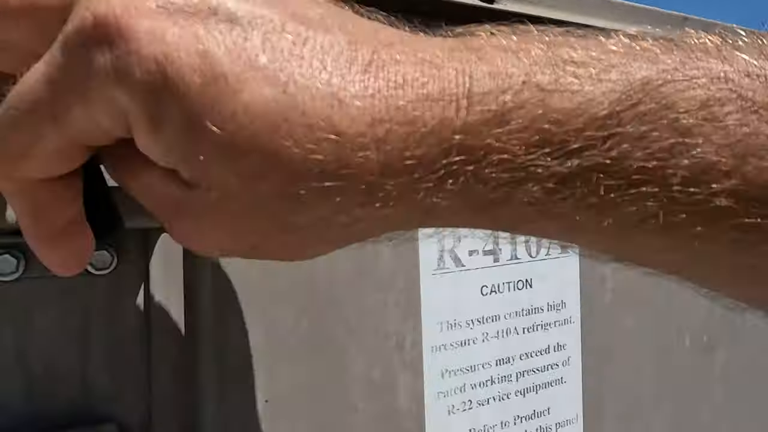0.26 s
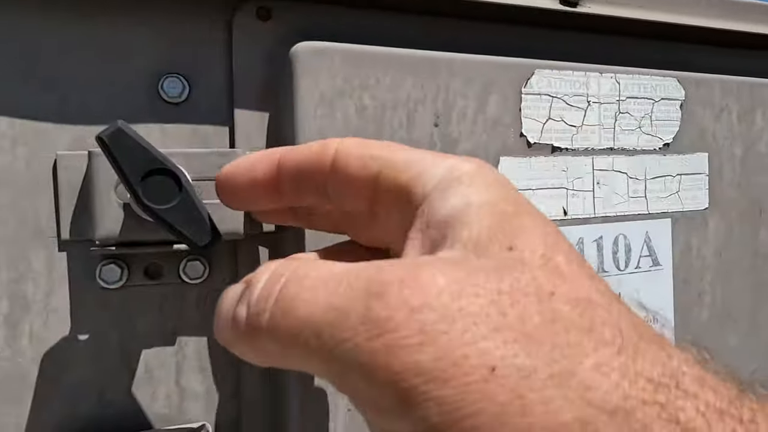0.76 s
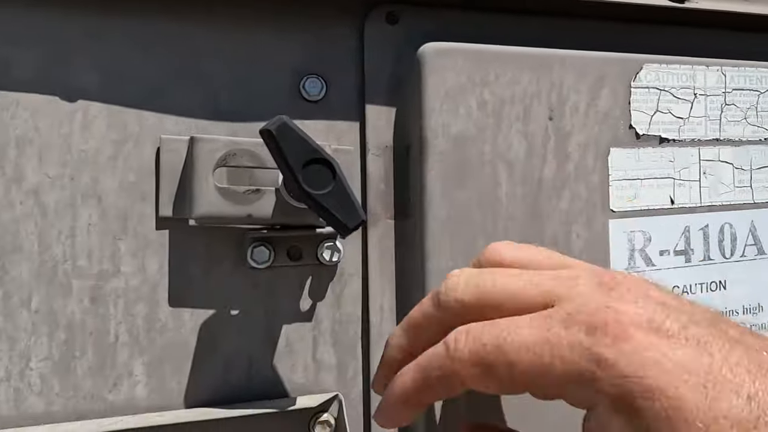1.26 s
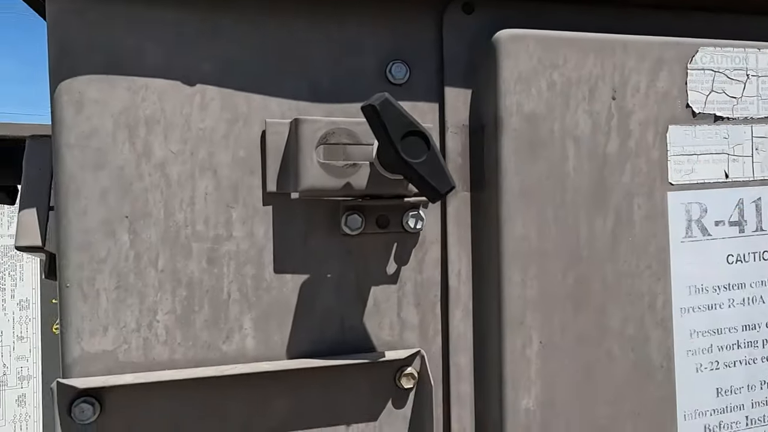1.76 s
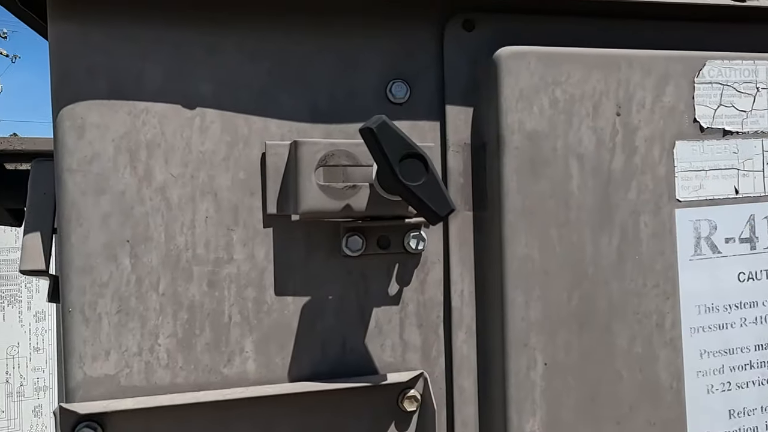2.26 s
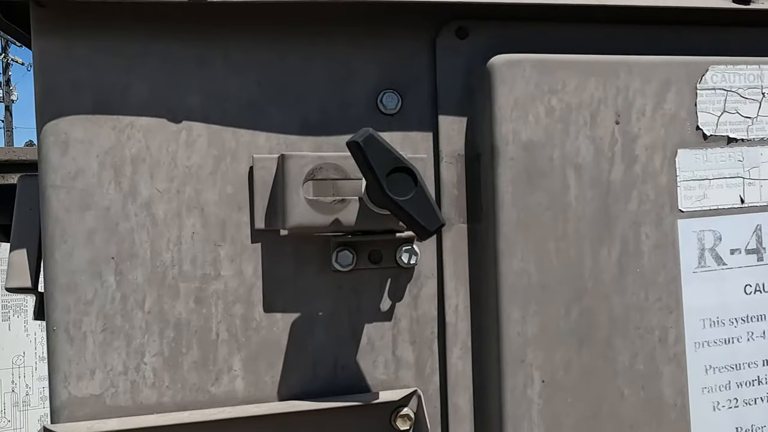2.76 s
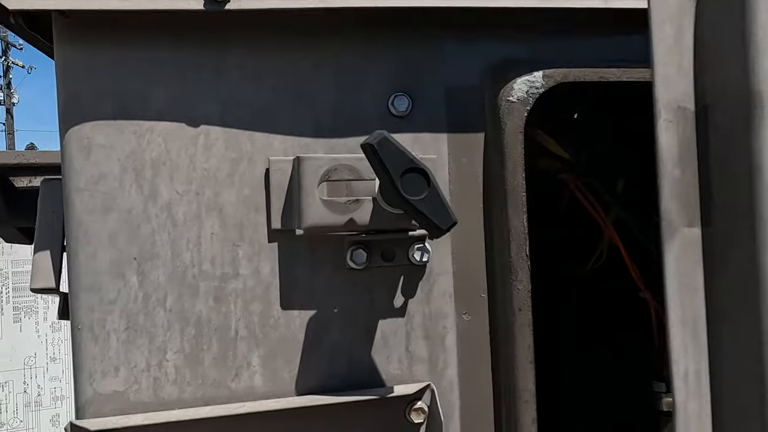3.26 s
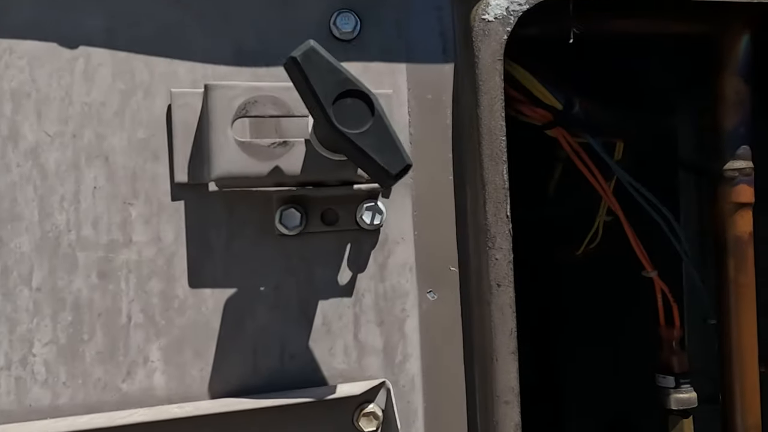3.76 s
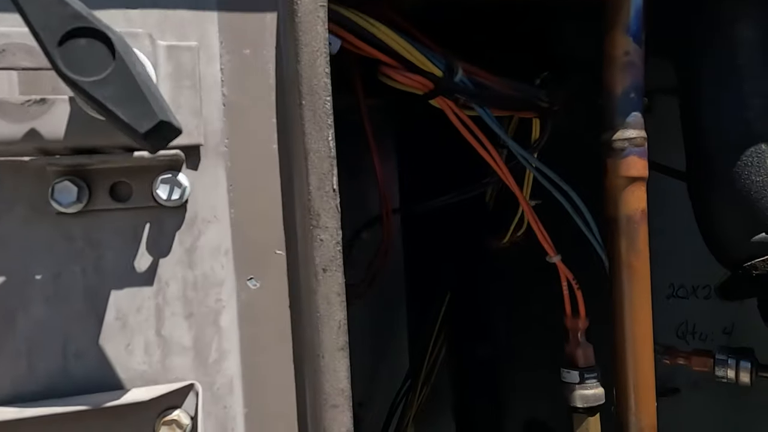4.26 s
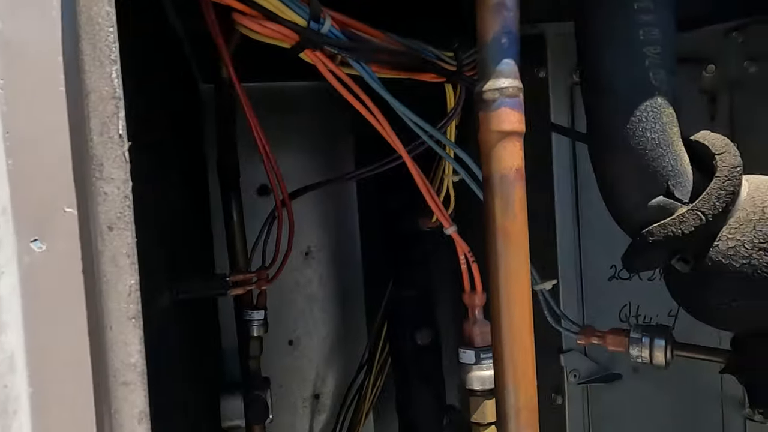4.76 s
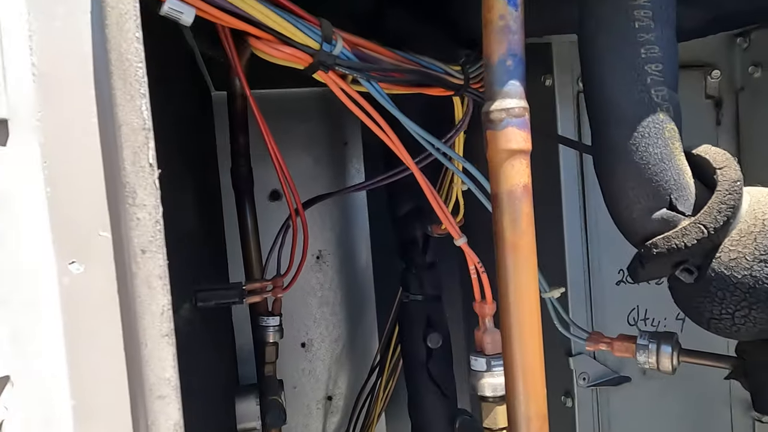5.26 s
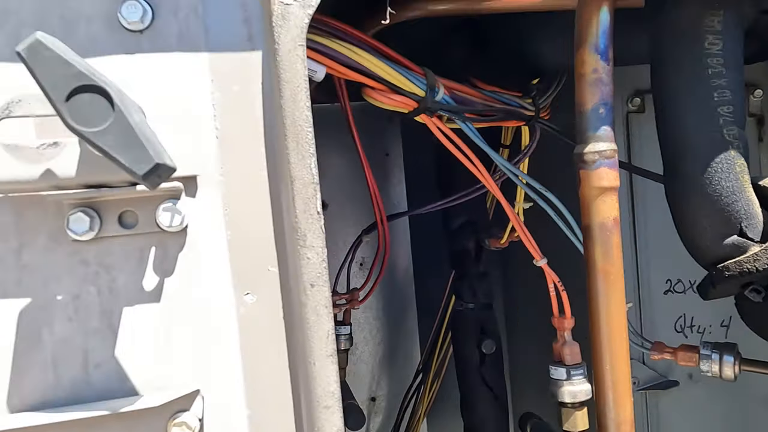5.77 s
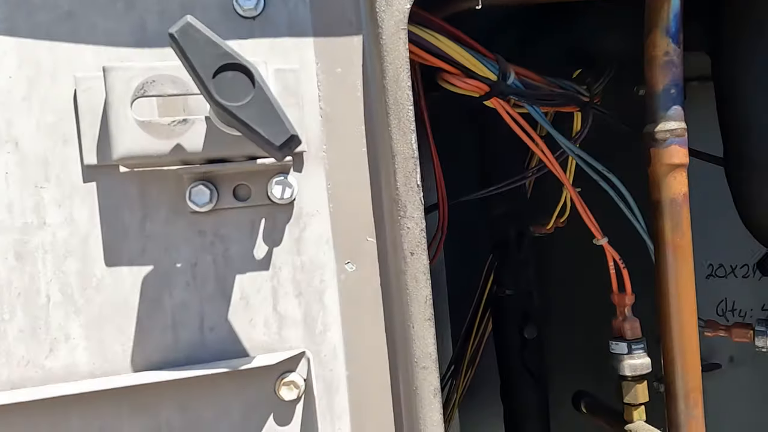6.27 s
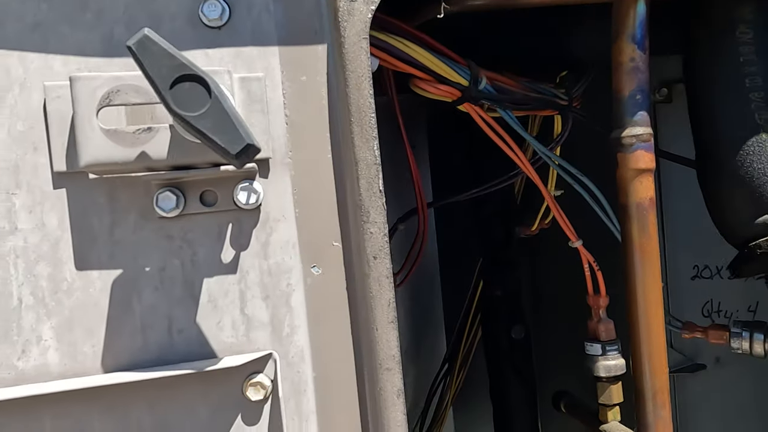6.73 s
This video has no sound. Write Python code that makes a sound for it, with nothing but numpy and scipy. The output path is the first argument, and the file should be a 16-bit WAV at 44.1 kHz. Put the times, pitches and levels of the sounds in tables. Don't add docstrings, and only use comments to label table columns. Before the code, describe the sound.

Throughout, a rooftop cooling unit gives a low housing rumble, a broad dull rush of air and a thinner panel hiss, close and dry outdoors. A loose flap puffs softly and irregularly until about 3.5 s, its bracket ringing faintly. At 0.25-0.35 s a hand knocks and rubs the handle; after more rubbing from 0.76 s, the catch snaps at 0.93 s, very loud, bright and short, with a small panel thud. The sound ducks, recovering over a few tenths. Fingers brush lightly. At 2.7-2.86 s dry metal ticks cluster, then the sheet door scrapes in short shudders from 3.0 to 4.1 s, with a knock at 3.44 s. Compressor clatter, about 58 pulses a second, swells from 3 to 4 s with gas hiss, pinging valves and steady whine. A last scrape and air gust come near 4.8 s; around 5 s the compressor's tone shifts, then continues to 7 s.

```python
import sys
import numpy as np
from scipy import signal
from scipy.fft import rfft, irfft
from scipy.io import wavfile
from scipy.ndimage import uniform_filter1d, map_coordinates

SR = 44100
rng = np.random.default_rng(int(sys.argv[2]) if len(sys.argv) > 2 else 0)


def log_audio(samples):
    frames = np.atleast_2d(samples).T
    limited = np.clip(frames, -1, 1)
    pcm = np.round(limited * 32767).astype(np.int16)
    wavfile.write(sys.argv[1], SR, pcm)


def invert_db(x):
    u = np.asarray(x, float) / 20
    return 10 ** u


N = 308700
T = np.arange(N) / SR
HIT_T = T[:4096]

SHAFT_HZ = 58.152
# (time [s], level [dB])
GAP_LEVEL = [
    (2.9, -54),
    (3.5, -42.5),
    (3.72, -38.5),
    (4.11, -37.5),
    (4.68, -37.5),
    (5.45, -39.5),
    (5.82, -40.5),
    (6.68, -39.5),
    (7.0, -39),
]
# (frequency [Hz], width [Hz], level [dB])
SHELL_MODES = [
    [(1130, 24, 1), (1490, 18, -23), (1810, 63, -16), (2650, 220, -5), (3390, 70, 0), (3760, 100, -5), (4050, 26, -20), (4570, 160, 0), (5070, 27, -3), (5880, 67, -23), (6700, 54, -10), (12200, 1300, -31)],
    [(1110, 32, -25), (1540, 30, -33), (2700, 350, -8), (3040, 36, -3), (3400, 77, -1), (4250, 56, -29), (4770, 72, -13), (5140, 79, 1), (5790, 100, -2), (6700, 20, 2), (10700, 110, -24), (12100, 630, 0)],
]
# (frequency [Hz], level [dB per Hz])
CLATTER_COLOUR = [(530, -33), (900, 5), (1150, -10), (1390, 3), (1490, -1), (1940, -3), (2340, -8),
                  (3370, -8.5), (5040, -12.5), (5480, -24), (5920, -7), (6400, -10.5), (10000, -39),
                  (13000, -65), (22000, -120)]
# (frequency [Hz], level [dB per Hz])
GAS_COLOUR = [(880, -8), (1500, -14), (1660, -26), (1880, -4), (2380, -20), (2750, -8.5), (3210, -18),
              (3480, -6.5), (4330, -10.5), (5200, -9), (5500, -10), (5700, -4.5), (5890, -5.5),
              (6690, -9.5), (7800, -18), (9180, -21.5), (11700, -18), (13100, -28.5)]
MOVE_S = 4.96, 5.13

# (frequency [Hz], at the door edge [dB], in the opening [dB], on the way in [dB], inside [dB])
VALVE_PLATES = [(5760, -50, -41.5, -48, -38), (6100, -56, -46, -44, -51), (3430, -52, -41, -48, -46),
                (3750, -45, -44, -54, -54), (4750, -54, -54, -54, -49)]
VALVE_PLACES_S = 4.05, 4.4, 4.75, 5.0, 5.35, 5.5
VALVE_DECAY_TURNS, VALVE_SCATTER_DB = .2, 2.5

# (multiple [shaft rates], at the door edge [dB rms], in the opening [dB rms], further in [dB rms])
WHINE_TONES = [(7, -32, -31.5, -32.5), (20, -50, -45, -43.5), (21, -50, -51, -50), (22, -58, -49, -46),
               (24, -60, -51, -50), (26, -50, -43.5, -46.5), (27, -54, -53, -48), (29, -52, -46, -53),
               (32, -49, -43, -50), (33, -48, -42, -47), (36, -57, -52, -49), (46, -51, -53, -55),
               (47, -62, -52, -54), (48, -62, -52, -53), (58, -57, -51, -56), (59, -55, -53, -54),
               (63, -62, -52, -58), (64, -53, -55, -57), (65, -49, -52, -54), (71, -43.5, -46, -56),
               (74, -55, -56, -59), (77, -57, -58, -57), (79, -50, -52, -58), (89, -55, -59, -58),
               (81, -54, -57, -54), (82, -56, -53, -55), (92, -54, -50, -55), (91, -62, -57, -55),
               (98, -58, -60, -55), (101, -66, -57, -54), (104, -58, -57, -58), (109, -63, -57, -61),
               (110, -63, -57, -62), (111, -58, -54, -55), (115, -53, -60, -60), (122, -66, -61, -66),
               (123, -67, -68, -64), (129, -69, -70, -68), (141, -69, -74, -65)]
WHINE_PLACES_S = 4.0, 4.35, 4.85, 5.3
BEAT_DEPTH = {26: .65, 71: .2, 79: .3}
BEAT_PERIOD_S, BEAT_TOP_S = .2636, 4.44
TONE_DRIFT_DB = 2.2
SHADOW_S, SHADOW_DB, SHADOW_HZ = (3.4, 3.7), -13, 2500

# (time [s], peak level [dB], pitch [Hz])
LATCH_KNOCKS = [
    (0.2535, -15, 2630),
    (0.3196, -11.5, 2420),
    (0.8444, -18, 2100),
    (3.4416, -26, 2720),
]
KNOCK_T60_S = 0.018
# (time [s], frequency [Hz], level [dB], length [s])
CATCH_RUBS = [(.898, 4000, -27, .025), (.9165, 1300, -13, .004), (.9215, 1600, -14, .004),
              (.9245, 2600, -20, .003), (.909, 4700, -27, .006), (.320, 1000, -20, .02),
              (.9298, 3100, -15, .002), (.929, 5000, -17, .0012), (.9325, 3200, -22, .004),
              (.938, 3600, -23, .007), (.950, 2200, -26, .006), (.917, 3500, -23, .008),
              (.9185, 2000, -19, .005), (.921, 6000, -31, .006), (.933, 7000, -36, .012),
              (.3225, 2700, -16, .005), (.3275, 3000, -17, .012), (.3405, 2500, -21, .01),
              (.321, 5000, -30, .015), (1.0585, 1300, -18, .004), (.833, 6500, -33, .005),
              (.836, 3000, -22, .008), (.790, 6800, -34, .006), (3.441, 4900, -27, .004),
              (3.613, 7000, -31, .006), (3.614, 3400, -26, .014), (3.657, 6800, -30, .008),
              (3.665, 3800, -26, .005), (3.530, 6300, -33, .006), (1.130, 6000, -30, .004)]
SNAP_S, SNAP_DB = .9286, 0.5
# (delay [s], frequency [Hz], level [dB], t60 [s])
SNAP_MODES = [(.0045, 260, -8, .08), (.001, 1440, -17, .02), (0, 1990, -14, .018), (0, 2400, -13, .018),
              (.001, 2900, -3, .014), (.001, 3140, -3, .013), (0, 3730, -4.5, .013), (0, 4400, -5, .008),
              (0, 5000, -5, .008), (0, 5870, -17, .012), (0, 6650, -15, .006), (0, 7370, -17, .011),
              (0, 8300, -21, .008), (0, 10200, -20, .006), (0, 11870, -23, .012)]
# (time [s], peak level [dB], pitch [Hz])
LIP_TICKS = [(.238, -32, 6700), (.281, -32, 6700), (.310, -27, 2500), (0.3201, -15, 2500),
             (.3200, -24, 4300), (0.2542, -19, 2570), (.2545, -25, 3800), (.2455, -27, 4300),
             (.369, -21, 2000), (1.059, -22, 2600), (2.722, -19, 2703), (2.7334, -26, 2680),
             (2.7418, -23, 2800), (2.749, -26, 3200), (2.7535, -24, 3300), (2.759, -24, 3300),
             (2.7660, -17, 2800), (2.7715, -24, 3000), (2.781, -21, 2800), (2.7974, -18, 2310),
             (2.8132, -24, 2840), (2.823, -17.5, 2100), (2.8450, -23, 2410), (2.8575, -26, 2000)]
TICK_T60_S, TICK_EDGE_DB = .012, -9
# (time [s], held [s], level [dB])
DOOR_DRAGS = [
    (.24, 0.18, -34.5),
    (.76, 0.26, -33.5),
    (2.72, 0.12, -37.5),
    (3.005, 0.044, -41),
    (3.1, 0.13, -33.5),
    (3.56, 0.026, -32),
    (3.613, 0.08, -31),
    (3.97, 0.12, -34),
    (4.8, 0.14, -37.5),
    (2.08, 0.02, -37),
]
DRAG_ATTACK_S, DRAG_RELEASE_S, SHEET_DB = 0.0078, 0.037, 1

FAN_TURN_S, FIRST_TURN_S = .0659, .04
FLAP_TURNS = [0, 1, 2, 3, 5, 9, 12, 17, 19, 20, 22, 24, 25, 27, 31, 32, 33, 35, 36, 39, 41, 42, 45, 47, 49,
              53]
FLAP_LEVELS = [-31, -31, -27.5, -31, -31, -27.5, -27, -24.5, -29, -25, -23.5, -40, -24.5, -26.5, -26.5, -43,
               -27.5, -32, -27, -27, -29, -26, -26, -24, -27, -28]
# (time [s], peak level [dB])
FINGER_BRUSHES = [(.278, -25), (.316, -30), (.405, -27), (.755, -28), (.787, -27), (1.10, -31),
                  (1.128, -30), (1.319, -38), (1.402, -30), (1.444, -30), (2.841, -30), (3.229, -36),
                  (3.442, -24)]
# (frequency [Hz], level [dB per Hz])
PUFF_COLOUR = [(1760, -17), (3000, 3.5), (3170, -22), (3540, -5), (4160, -8), (5060, -6.5), (6640, -10),
               (9140, -29), (12100, -17.5), (13100, -29)]
PUFF_S, PUFF_BODY_DB = 0.032, -37.5
BRUSH_S, BRUSH_BODY_DB = 0.025, -37
BODY_FOLLOWS = 0.14
# (frequency [Hz], level [dB], t60 [s])
BRACKET_RINGS = [
    (3450, -29, 0.13),
    (2850, -25.5, 0.079),
]
RING_HEARD_S, RING_FAR_DB = (1.7, 2.05, 3.05, 3.3), -6.5

# (time [s], level [dB])
AIR_FLOW = [(0.0, -21), (0.04, -19.5), (0.1, -20), (1.52, -23), (2.22, -19.5), (3.8, -22.5), (4.37, -21.5),
            (4.76, -26), (4.84, -17), (4.95, -27), (4.97, -22), (6.94, -23), (6.96, -19.5), (7.0, -26)]
# (frequency [Hz], level [dB per Hz])
RUMBLE_COLOUR = [(15, -50), (33, -36), (42, -12), (78, -11.5), (97, 1.5), (140, -3), (180, -49),
                 (310, -120)]
# (frequency [Hz], level [dB per Hz])
RUSH_COLOUR = [(71, -41), (120, -17), (183, -4), (215, -3.5), (291, -2), (333, -7), (371, -7), (404, -11),
               (436, -12.5), (482, -14), (900, -29.5), (1170, -30.5), (1980, -120)]
# (frequency [Hz], level [dB per Hz])
HISS_COLOUR = [(290, -9), (500, -3), (589, -1.5), (924, -7), (1130, -5), (1470, -9), (1800, -9),
               (2500, -14.5), (2910, -14), (6600, -29), (9160, -49), (11700, -40), (13100, -49)]
# (time [s], time [s]), hiss [dB], rumble [dB]
ENTER_S, BAY_HISS_DB, BAY_RUMBLE_DB = (4.1, 3.56), -2, 3

# (frequency [Hz], level [dB per Hz])
PORT_COLOUR = [(5590, -88), (9500, -56), (9580, -35), (9740, -30), (10600, -21), (11700, -5), (12400, 6),
               (13100, -7)]
# (start [s], end [s])
TREBLE_SPELLS = [(.42, 0.78), (1.15, 1.36), (1.66, 1.8), (2.45, 2.6), (2.86, 3.56), (5.12, 6), (6.84, 8.1)]


def unit(x):
    return x / np.sqrt(np.mean(x ** 2))


def gain_at(hz, colour):
    f, db = np.transpose(colour)
    return invert_db(np.interp(np.log(hz + 1), np.log(f), db))


def band(x, lo_hz, hi_hz):
    return signal.sosfilt(signal.butter(2, [lo_hz, hi_hz], "band", fs=SR, output="sos"), x)


def walk(rate, count=1):
    hold = int(SR / rate)
    steps = np.repeat(rng.standard_normal((count, N // hold + 1)), hold, axis=1)
    return unit(uniform_filter1d(steps, hold)[:, :N])


def eddies(colour, flicker_db, rate):
    hz = np.arange(N // 2 + 1) * SR / N
    spec = rfft(rng.standard_normal(N)) * gain_at(hz, colour)
    octaves = np.arange(np.log2(colour[-1][0] / colour[0][0]) + 1)
    edges = colour[0][0] * 2. ** octaves
    parts = [irfft(spec * (hz >= a) * (hz < b), N) for a, b in zip(edges, edges[1:])]
    flicker = invert_db(flicker_db * walk(rate, count=len(parts)))
    return unit(np.sum(parts * flicker, axis=0))


def ring(hz, t60):
    return np.sin(2 * np.pi * hz * HIT_T) * np.exp(-np.log(1000) * HIT_T / max(t60, .004))


def add(out, s, x):
    i = int(s * SR)
    out[i:i + len(x)] += x


def gap_db():
    s, db = np.transpose(GAP_LEVEL)
    return np.interp(T, s, db, left=-62) + 40


def open_bay():
    move = np.interp(T, MOVE_S, [0, 1])
    gas = eddies(GAS_COLOUR, flicker_db=0.84, rate=11)
    edge, inside = (compressor(modes, gas) for modes in SHELL_MODES)
    return invert_db(gap_db()) * ((1 - move) ** 0.98 * edge + move ** 0.86 * inside + valve())


def compressor(modes, gas):
    chance = rng.standard_normal((23, 4096))
    chance = chance + 0.98 * chance[0]
    hz = np.arange(2049) * SHAFT_HZ
    force = rfft(chance * blow(np.arange(4096) / 4096, rest=0.95))
    force[:, [k for k, *_ in WHINE_TONES]] *= .2
    turns = irfft(force * gain_at(hz, CLATTER_COLOUR) * shell(hz, modes, lift_db=3.0) * (hz < 14000))
    phase = (T * SHAFT_HZ + .75) % 1
    clatter = map_coordinates(turns, [T * 3, phase * 4095], order=1)
    gas_spec = rfft(gas * blow(phase, rest=0.7))
    gas = irfft(gas_spec * shell(np.arange(N // 2 + 1) * SR / N, modes, lift_db=3.0), N)
    return invert_db(-39.5) * unit(clatter) + invert_db(-39.5) * unit(gas)


def blow(phase, rest):
    return rest + np.exp(-phase / 0.16)


def shell(hz, modes, lift_db):
    return 1 + sum(invert_db(0.29 * db + lift_db) / (1 + (2 * (hz - f) / max(w, 130)) ** 2) for f, w, db in modes)


def valve():
    turn = T * SHAFT_HZ + .87
    x = turn % 1 / VALVE_DECAY_TURNS * 2
    per_turn = rng.standard_normal((int(turn[-1]) + 1, len(VALVE_PLATES) + 1))
    blows = per_turn[turn.astype(int)].T
    shared = blows[0]
    slow_levels = walk(9, count=len(VALVE_PLATES))
    out = np.zeros(N)
    for (hz, edge, opening, way, inside), own, slow in zip(VALVE_PLATES, blows[1:], slow_levels):
        db = np.interp(T, VALVE_PLACES_S, [edge, opening, opening, way, way, inside])
        db = db + VALVE_SCATTER_DB * (shared + .6 * own + 0.85 * slow)
        locked_hz = np.round(hz / SHAFT_HZ) * SHAFT_HZ
        out += invert_db(db) * np.sin(2 * np.pi * (locked_hz * T + .06 * own))
    return out * x * np.exp(1 - x)


def whine():
    opening_db = np.minimum(gap_db(), 0)
    shadow_db = np.interp(T, SHADOW_S, [SHADOW_DB, 0])
    beat = np.cos(2 * np.pi * (T - BEAT_TOP_S) / BEAT_PERIOD_S)
    out = np.zeros(N)
    for (k, edge, opening, inside), drift in zip(WHINE_TONES, walk(5, count=len(WHINE_TONES))):
        hz = k * SHAFT_HZ
        level_db = np.interp(T, WHINE_PLACES_S, [edge, opening, opening, inside])
        level_db = level_db + min(hz / 600, TONE_DRIFT_DB) * drift + shadow_db * (hz > SHADOW_HZ)
        looseness = .04 + .08 * (hz < 5500) + .2 * (hz < SHADOW_HZ)
        lag = .77 * (k - 99) + looseness * rng.standard_normal()
        tone = np.sin(2 * np.pi * (hz * T + lag + .04 * drift))
        out += invert_db(level_db + 3.5) * (1 + BEAT_DEPTH.get(k, 0) * beat) * tone
    return out * invert_db(opening_db)


def latch():
    out = np.zeros(N)
    t = HIT_T
    for s, db, hz in LATCH_KNOCKS:
        rattle = unit(band(rng.standard_normal(len(t)), 0.7 * hz, 1.1 * hz))
        rattle = rattle * np.exp(-np.log(1000) * t / KNOCK_T60_S)
        knock = (rattle + 0.58 * ring(hz, KNOCK_T60_S)) * (1 - np.exp(-t / 0.00043))
        add(out, s, invert_db(db - 2.0) * knock)
    for s, hz, db, length in CATCH_RUBS:
        rub = band(band(rng.standard_normal(len(t)), 0.5 * hz, 1.23 * hz), 0.5 * hz, 1.23 * hz)
        swell = np.exp(-t / length) * (1 - np.exp(-4 * t / length))
        weights = np.exp(-2 * t / length) * (1 - np.exp(-4 * t / length)) ** 2
        rub = rub / np.sqrt(np.average(rub ** 2, weights=weights))
        add(out, s, invert_db(db) * rub * swell)
    for k, (lag, hz, db, t60) in enumerate(SNAP_MODES):
        sign = (-1) ** k
        add(out, SNAP_S + lag, sign * invert_db(SNAP_DB + db) * ring(hz, t60) * (1 - np.exp(-t / .0002)))
    crack = band(rng.standard_normal(len(t)), 1000, 13000)
    add(out, SNAP_S, invert_db(-21) * crack * (np.exp(-t / .0014) + .15 * np.exp(-t / .008)))
    return out


def ticks():
    out = np.zeros(N)
    t = HIT_T
    for s, db, hz in LIP_TICKS:
        edge = unit(band(band(rng.standard_normal(len(t)), 1500, 6500), 1500, 6500)) * np.exp(-t / .0012)
        body = ring(hz, TICK_T60_S) * (1 - np.exp(-t / 0.00023))
        add(out, s, invert_db(db) * (body + invert_db(TICK_EDGE_DB) * edge))
    return out


def door():
    level = np.zeros(N)
    for s, length, db in DOOR_DRAGS:
        corners = s + np.cumsum([0, DRAG_ATTACK_S, length, DRAG_RELEASE_S])
        level += invert_db(db) * np.interp(T, corners, [0, 1, 1, 0])
    grains = rng.standard_normal(N) * invert_db(2.5 * rng.exponential(size=N)) * invert_db(1.5 * walk(120)[0])
    scrape = unit(band(grains, 1520, 2810))
    sheet = unit(band(grains, 450, 1050))
    return level * (scrape + invert_db(SHEET_DB) * sheet)


def puffs():
    top, body, rings = np.zeros(N), np.zeros(N), np.zeros(N)
    t = HIT_T
    flaps = [(FIRST_TURN_S + k * FAN_TURN_S, db, PUFF_S, PUFF_BODY_DB)
             for k, db in zip(FLAP_TURNS, FLAP_LEVELS)]
    brushes = [(s, db, BRUSH_S, BRUSH_BODY_DB) for s, db in FINGER_BRUSHES]
    for s, db, length, body_db in flaps + brushes:
        x = t / length * 3
        burst = (1 - np.exp(-t / 0.0022)) * (1 + x) * np.exp(-x)
        add(top, s, invert_db(db - 10.0) * burst)
        add(body, s, invert_db(body_db + BODY_FOLLOWS * (db + 22)) * burst)
    for (s, hit_db, *_), slip in zip(flaps, rng.standard_normal((len(flaps), 2))):
        for hz, db, t60 in BRACKET_RINGS:
            level = invert_db(db + 0.47 * (hit_db + 27.5) + 1.7 * slip[0])
            add(rings, s, level * ring(hz * (1 + 0.0033 * slip[1]), t60) * (1 - np.exp(-t / 0.0099)))
    rings = rings * invert_db(np.interp(T, RING_HEARD_S, [RING_FAR_DB, 0, 0, RING_FAR_DB]))
    bright = top * eddies(PUFF_COLOUR, flicker_db=1.0, rate=340)
    dull = body * unit(band(rng.standard_normal(N), 2100, 4000))
    return bright + dull + rings


def fan():
    flow_db = np.interp(T, *np.transpose(AIR_FLOW)) + 21
    inside = np.interp(T, ENTER_S, [0, 1])
    rumble_db = -33.0 + 0.17 * flow_db + BAY_RUMBLE_DB * inside
    hiss_db = -30.0 + 0.24 * flow_db + BAY_HISS_DB * inside
    rumble = eddies(RUMBLE_COLOUR, flicker_db=-0.4, rate=4.5) * invert_db(rumble_db)
    rush = eddies(RUSH_COLOUR, flicker_db=0.76, rate=14) * invert_db(-20.5 + flow_db)
    hiss = eddies(HISS_COLOUR, flicker_db=1.24, rate=25) * invert_db(hiss_db)
    return rumble + rush + hiss


def scene():
    mid = fan() + open_bay() + puffs() + latch() + door() + whine() + ticks()
    top = band(mid, 10600, 21000)
    top_level = np.sqrt(uniform_filter1d(top ** 2, 300) + 1e-12)
    side = invert_db(-6.0) * top_level * eddies(PORT_COLOUR, flicker_db=2.0, rate=30) - 0.21 * top
    in_spell = uniform_filter1d(sum(1. * (T > a) * (T < b) for a, b in TREBLE_SPELLS), 600)
    late_treble = np.roll(band(mid, 3800, 8000), 40)
    side += invert_db(-19) * in_spell * invert_db(4.0 * walk(25)[0]) * late_treble
    return np.array([mid + side, mid - side])


def low_pass(x):
    return signal.sosfilt(signal.butter(12, 13950, fs=SR, output="sos"), x)


def record(dry):
    b, a = signal.iirnotch(9040, 26, fs=SR)
    x = signal.lfilter(b, a, signal.lfilter(b, a, dry))
    x += (dry - x) * invert_db(-28 + 7 * walk(12)[0])
    x = signal.sosfilt(signal.butter(6, 38, "high", fs=SR, output="sos"), x)
    x = signal.sosfilt(signal.butter(12, 13100, fs=SR, output="sos"), x)
    duck_s = SNAP_S + .012
    duck_db = -7 * np.exp(-np.clip(T - SNAP_S - .012, 0, 9) / 0.12) * (T > duck_s)
    x = np.clip(x * uniform_filter1d(invert_db(duck_db), 400), -1, 1)
    return low_pass(x)


dry = scene()
out = record(dry)
log_audio(out)
```